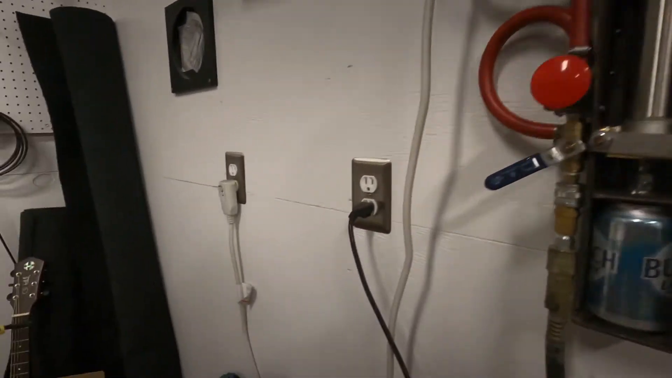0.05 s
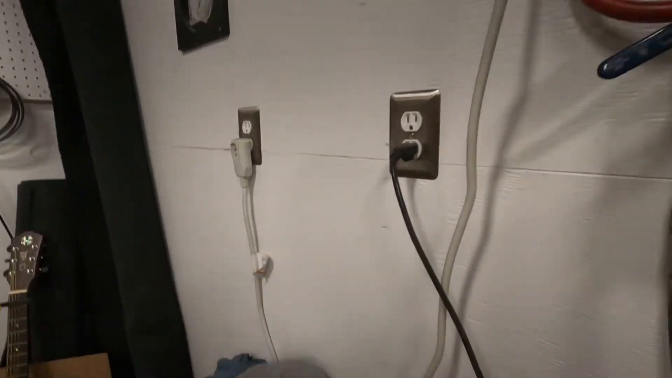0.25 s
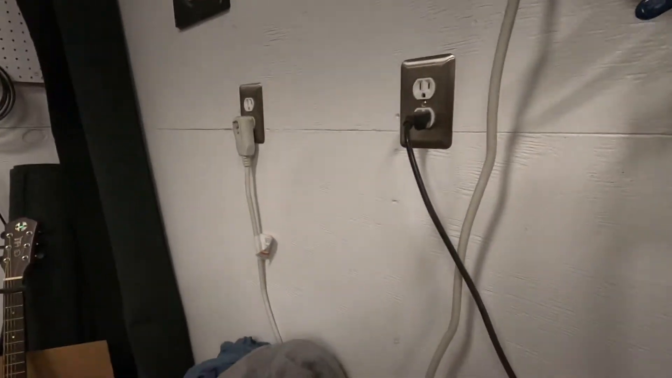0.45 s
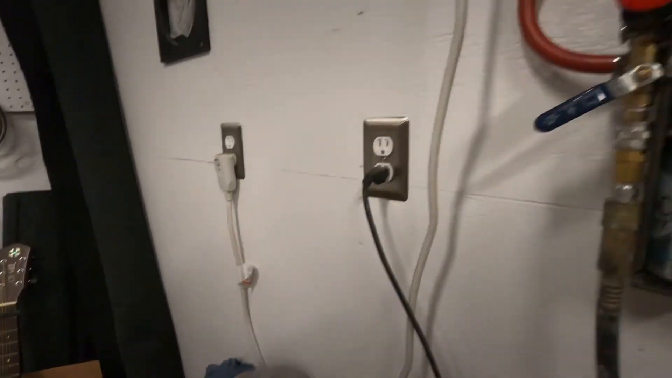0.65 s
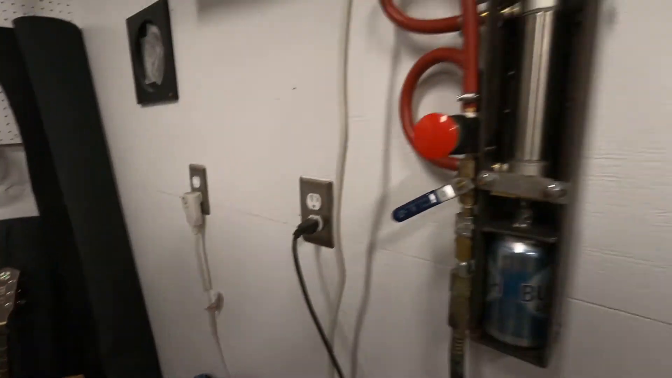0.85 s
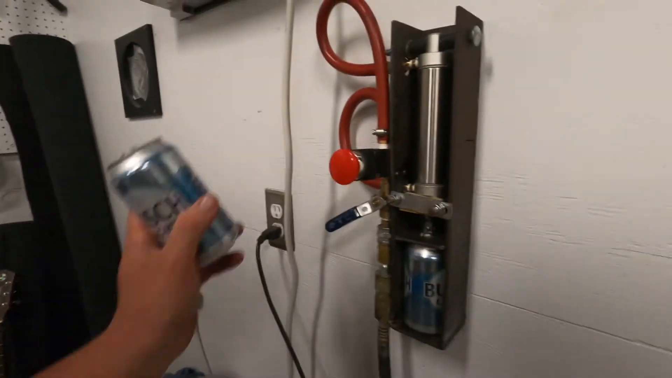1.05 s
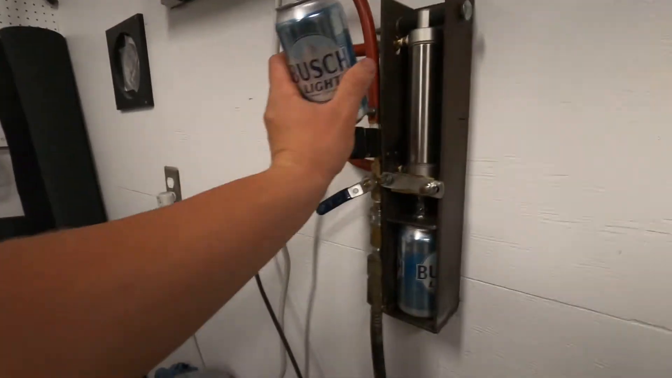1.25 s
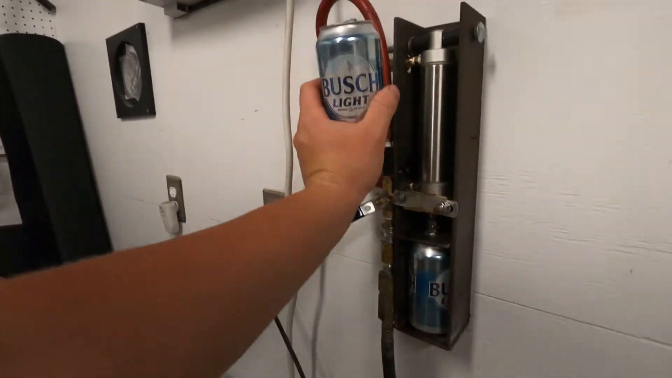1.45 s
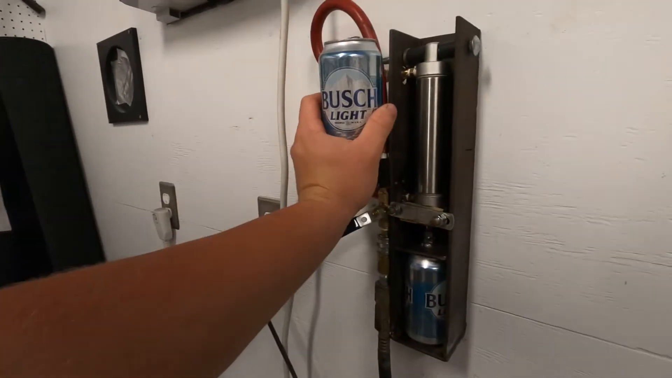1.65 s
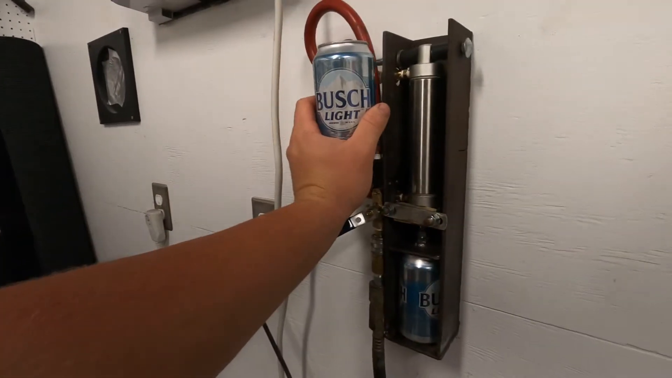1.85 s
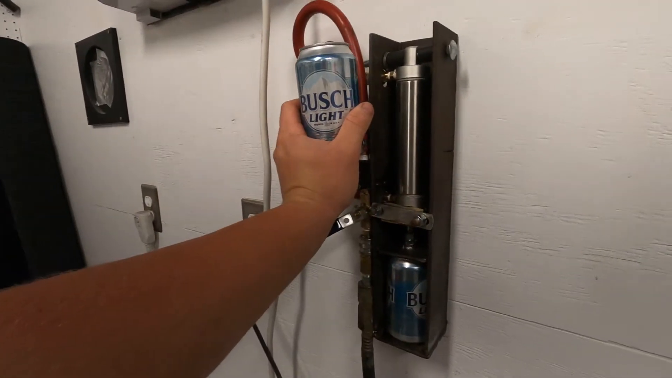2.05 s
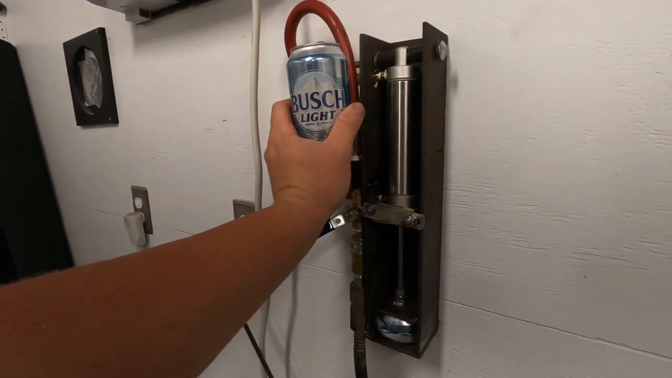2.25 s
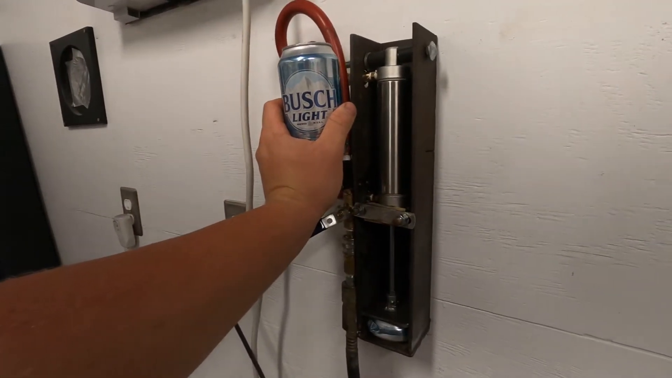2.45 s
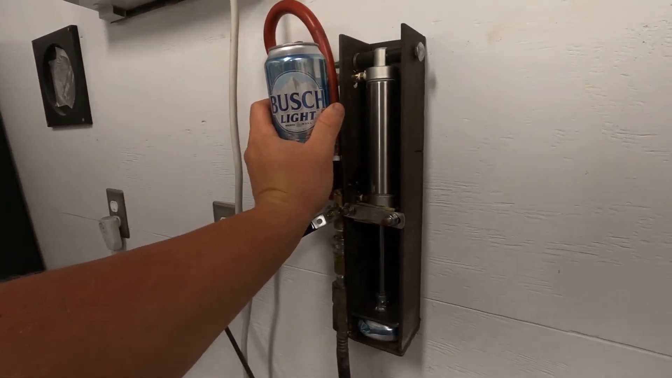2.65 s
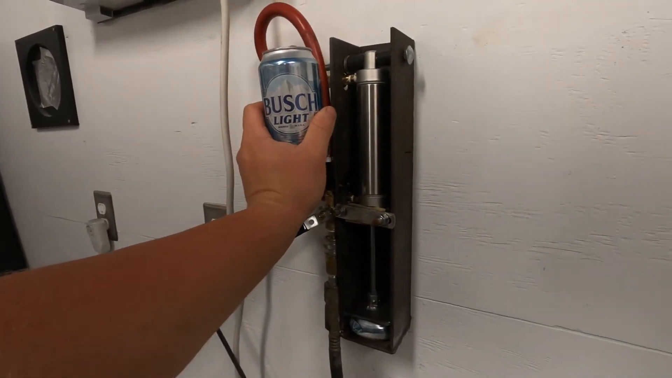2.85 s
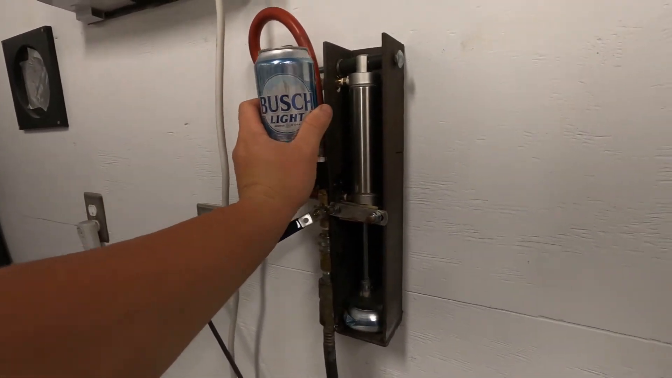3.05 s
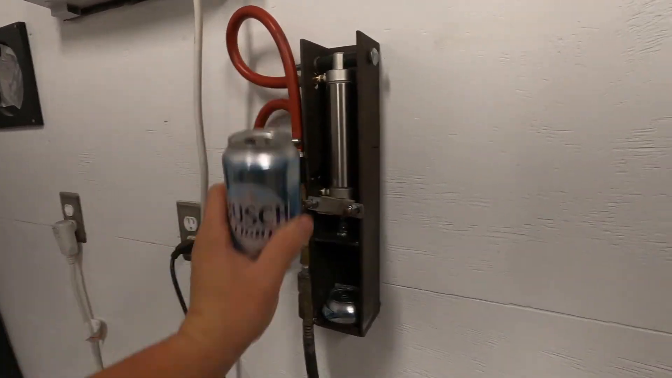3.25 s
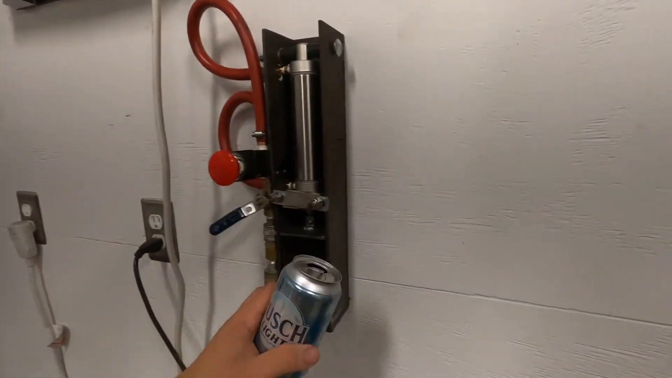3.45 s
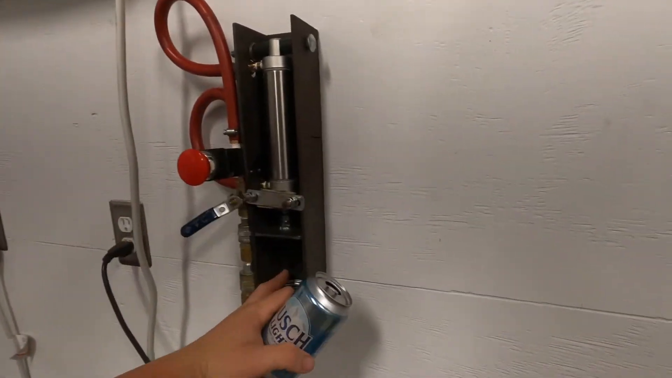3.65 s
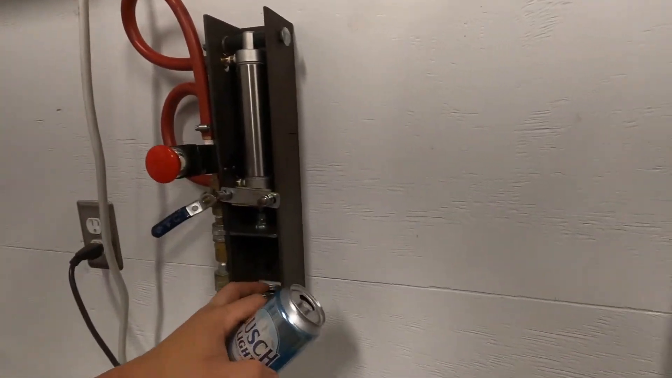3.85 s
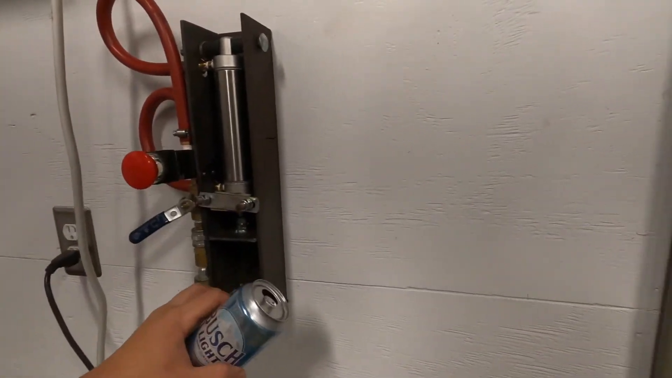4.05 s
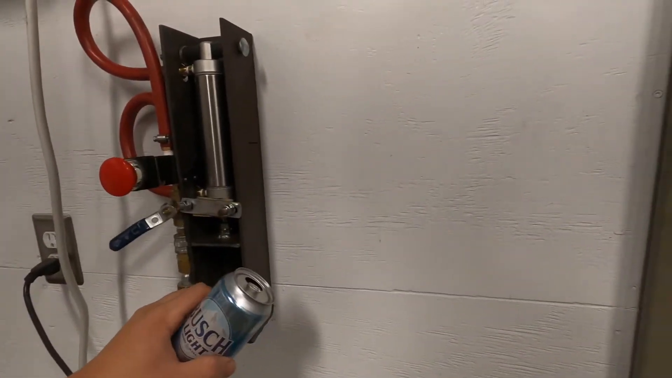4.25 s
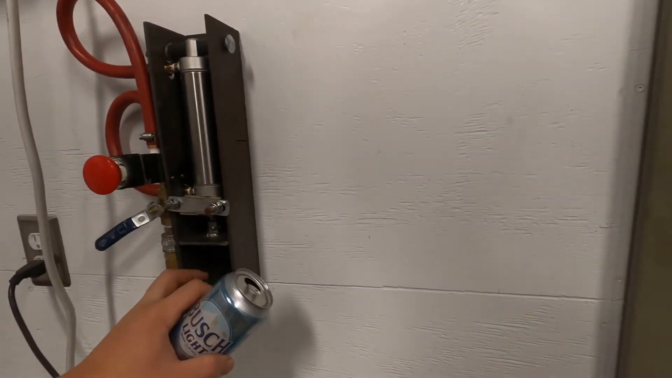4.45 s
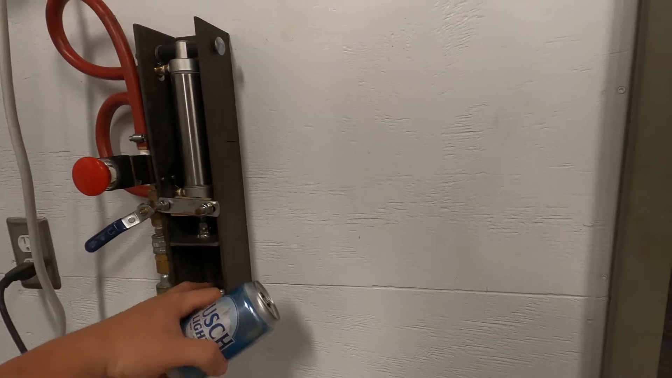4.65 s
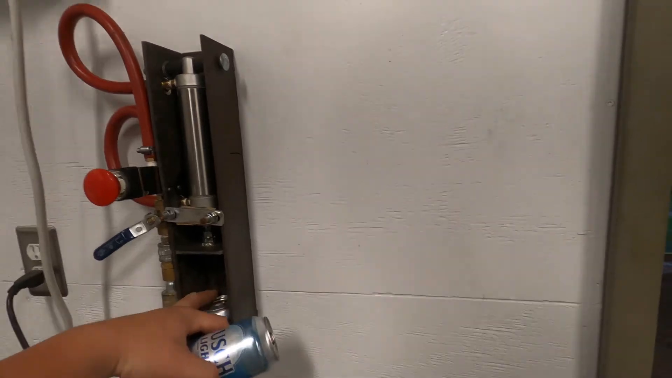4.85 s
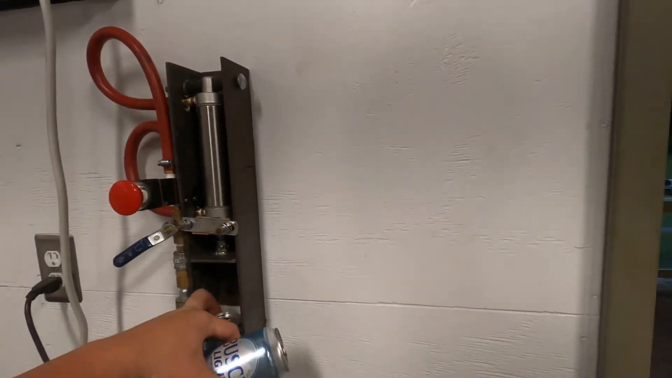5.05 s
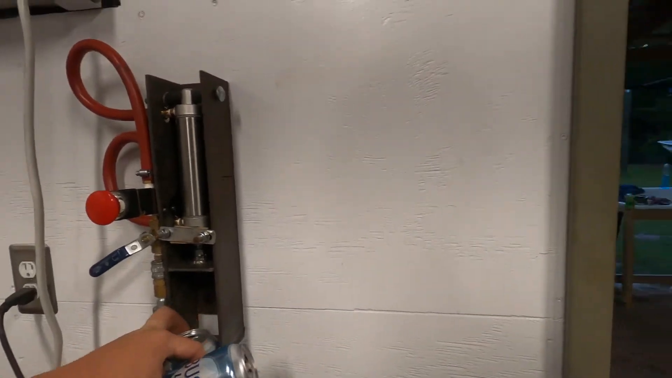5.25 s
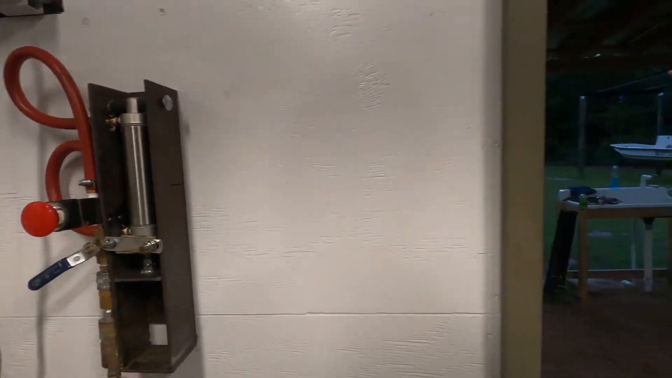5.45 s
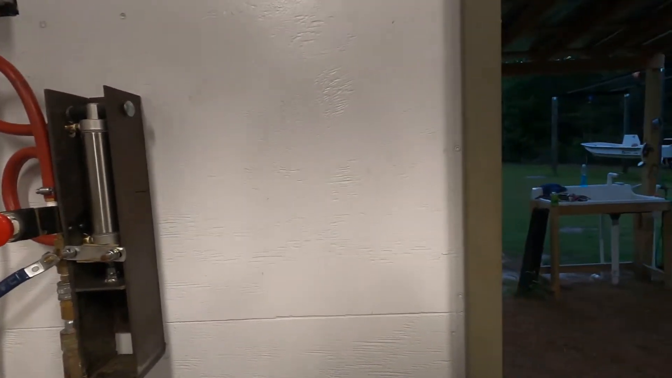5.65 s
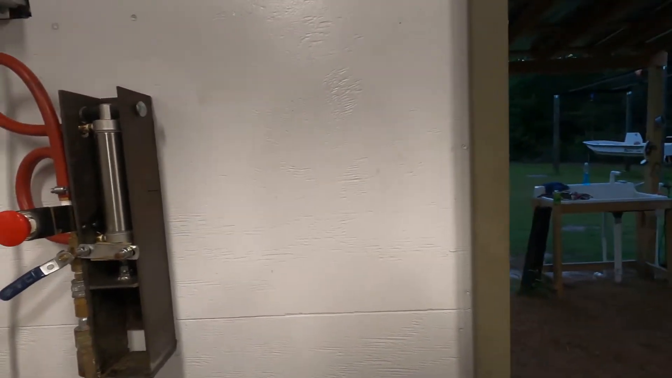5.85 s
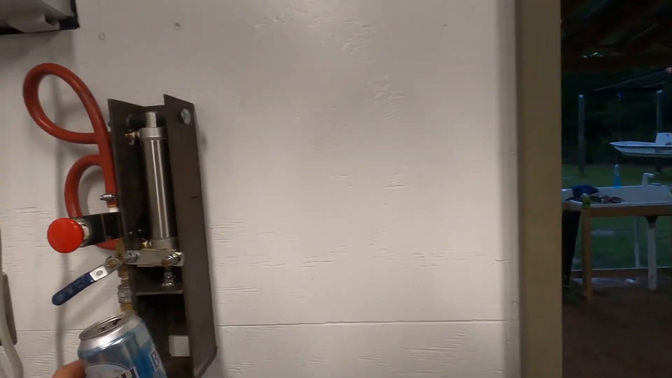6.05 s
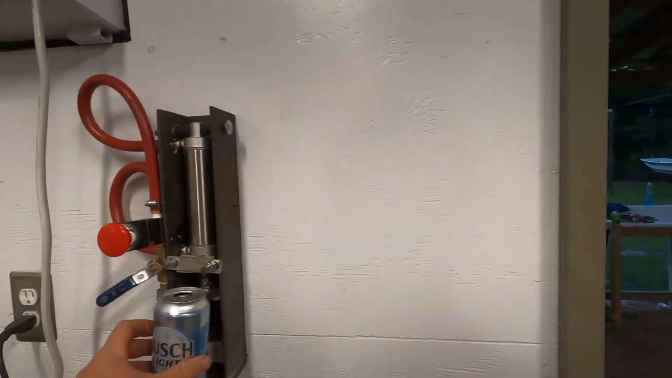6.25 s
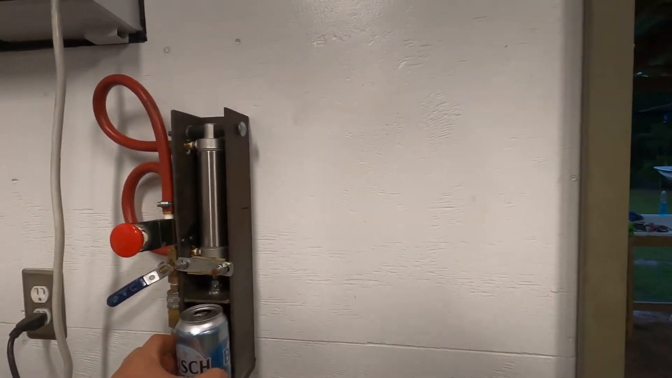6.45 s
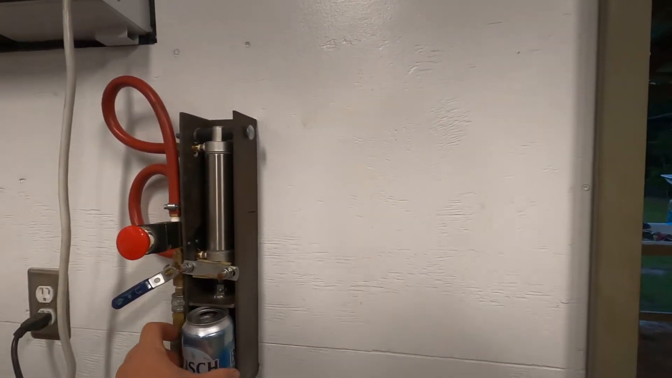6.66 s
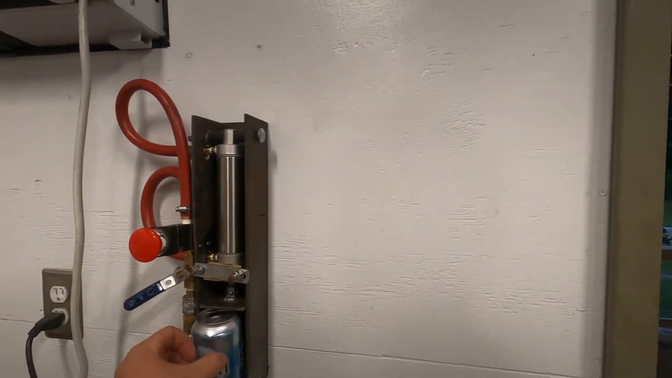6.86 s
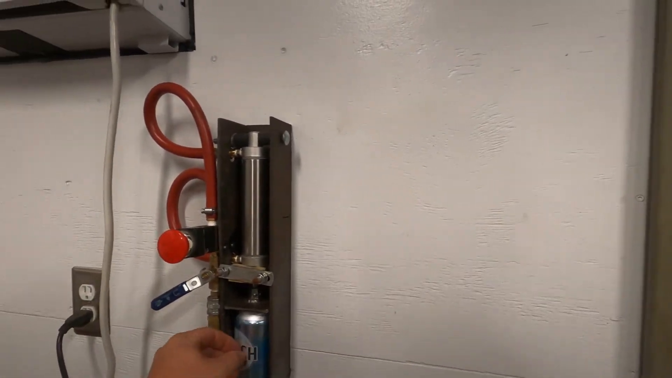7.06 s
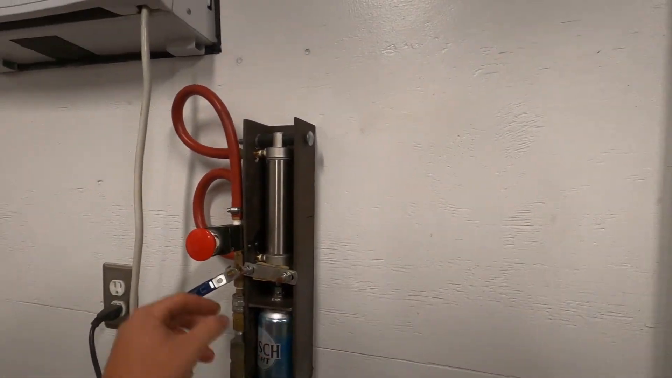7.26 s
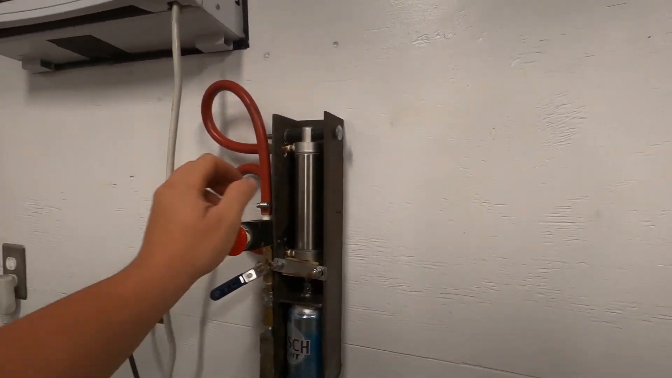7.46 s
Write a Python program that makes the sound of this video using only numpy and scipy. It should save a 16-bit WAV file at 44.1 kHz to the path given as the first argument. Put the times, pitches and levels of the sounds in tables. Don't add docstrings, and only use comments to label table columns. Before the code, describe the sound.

Hand-held close stereo pickup, nearly mono, with low handling thumps. A light can is knocked about and pressed on a button; the valve bursts open, a piston slams and thin metal crunches in rapid snaps. After a pause, air bursts out again and softly roars as the ram returns. Small metallic ticks and scrapes come from removing the flattened can, then fuller hollow clunks from seating another. Short hard-walled workshop echo, thin background hiss.

```python
import sys
import numpy as np
from scipy import signal
from scipy.fft import rfft, irfft
from scipy.io import wavfile
from scipy.ndimage import uniform_filter1d

SR = 44100
rng = np.random.default_rng(int(sys.argv[2]) if len(sys.argv) > 2 else 0)


def ratio_of_db(decibels):
    return 10 ** (np.asarray(decibels, float) / 20)


def generate_wav(sig):
    pcm = np.round(np.clip(np.atleast_2d(sig).T, -1, 1) * 32767).astype(np.int16)
    wavfile.write(sys.argv[1], SR, pcm)


N = 331632
VALVE_OPENS_S = 0.005

# time in seconds, gain in dB, room murmur in dB, thin hiss in dB.
BACKGROUND_LEVELS = [(0, -2, 4, -4), (.5, 1, -0.5, -5), (1.3, 1, -1.5, 3), (1.55, -1.5, 4, -1),
                     (1.8, -2, -15, -1), (2.6, -6.5, -11, -3), (3.1, -9, -3, 1), (3.4, -8, -3, -14),
                     (3.7, -8.5, -3, -13), (4.05, -6.5, -5, -12), (4.4, -6.5, 4, 1), (5.3, 0, -0.5, 4),
                     (5.9, -1.5, -6, 3), (6.5, -1.5, -4, 3.5), (7.52, -1, -6, -1)]
# frequency in Hz, density in dB per Hz.
BACKGROUND_COLOUR = [(100, 1), (250, -3.5), (420, 0), (800, -18.5), (1250, -9.5), (2000, -9.5),
                     (2700, -5.5), (3300, -10.5), (4800, -0.5), (6200, -13.5), (7200, -13.5), (9500, -11),
                     (11500, -20.5), (13500, -19.5)]
# frequency in Hz, peak level in dB.
HUM = [(527.6, -67.5), (2595, -82.5), (2708, -63.5), (2826, -75)]
# frequency in Hz, decay time t60 in seconds.
ROOM_DECAY = [(150, 1), (500, 0.72), (2000, 0.7), (6000, 0.55), (12000, 0.37)]
# time in seconds, peak in dB, fall in dB per second.
HANDLING = [(.06, -40.5, 230), (.4, -53, 35), (.77, -37.5, 34), (1.357, -19, 131), (1.84, -32.5, 301),
            (2.22, -35, 22), (3.14, -33, 53), (3.55, -46, 26), (1.55, -49, 40), (4.88, -36.5, 49),
            (5.57, -40.5, 90), (6.01, -43, 23), (6.2, -44, 80), (6.4, -46, 18), (7.1, -39.5, 51)]
# frequency in Hz, density in dB per Hz.
HANDLING_COLOUR = [(15, -9), (35, 1), (80, 0.5), (130, -13), (220, -20), (500, -60)]
# time in seconds, peak in dB, fall in dB per second.
PANEL = [
    (1.84, -43, 110),
    (2.5, -49.5, 24),
    (3.45, -43, 15),
    (3.95, -48, 50),
    (5.25, -49, 50),
    (7.4, -53.5, 17),
]
# frequency in Hz, density in dB per Hz.
PANEL_COLOUR = [(70, -27), (110, 0.5), (160, 2.5), (230, -5), (330, -40.5)]
# time in seconds, level in dB.
GUST = [
    (1.29, -52),
    (1.318, -25),
    (1.41, -58.5),
]
# time in seconds, level in dB.
SLEEVE = [(.72, -65), (.8, -52), (.92, -48), (1.1, -59.5), (1.28, -71)]
# centre in Hz, width in Hz, level in dB.
SLEEVE_BANDS = [(1250, 200, 8), (2000, 360, 10.5), (600, 170, 6.5)]

# start in seconds, peak in dB, contact colour in Hz, rattle length in seconds.
HELD = [(.36, -23, 1140, 0.022), (.382, -12.5, 1060, 0.011), (.419, -14.5, 900, 0.0082),
        (.476, -15, 950, 0.00058), (.744, -30, 1530, 0.01)]
TAPPED = [
    (.067, -33.5, 533, 0.0047),
    (1.296, -25, 1250, 0.026),
    (1.394, -6.5, 1850, 0.0014),
    (1.4205, -8.5, 1470, 0.0058),
]
RAM = [
    (2.143, -32, 2100, 0.0054),
    (2.1495, -2.5, 2700, 0.002),
    (3.237, -6, 2500, 0.0017),
]
CRUMPLE = [(2.221, 0, 2190, 0.015), (2.235, 0, 1580, 0.0088), (2.243, -2.5, 1900, 0.0071),
           (2.259, -17.5, 1200, 0.0078), (2.279, -12, 1210, 0.014), (2.296, 0, 1850, 0.0081),
           (2.305, -1.5, 1680, 0.0043)]
CREASES = [(2.318, -5.5, 2500, 0.0018), (2.359, -11.5, 3000, 0.0044), (2.369, -20, 5900, 0.0027),
           (2.374, -11.5, 2500, 0.0046), (2.39, -22, 2500, .002), (2.398, -6, 2380, 0.0036),
           (2.407, -12, 3200, 0.015)]
FLAT = [(3.706, -28.5, 805, 0.031), (3.724, -21, 1100, 0.011), (3.744, -29, 1146, 0.01),
        (3.907, -20.5, 900, 0.017), (3.929, -20, 824, 0.012), (3.958, -20, 1200, 0.013),
        (4.174, -34, 960, 0.016), (4.238, -35.5, 890, 0.01), (4.264, -32.5, 1750, 0.0033),
        (4.289, -23, 1080, 0.0073), (4.302, -17.5, 960, 0.0047), (4.387, -28.5, 1080, 0.01),
        (4.463, -11, 960, 0.0041), (4.477, -15.5, 865, 0.014), (4.503, -24.5, 960, 0.01),
        (4.553, -15.5, 950, 0.0061), (4.325, -27, 910, 0.0079), (5.011, -25, 2030, 0.0065),
        (5.026, -6, 1140, 0.012), (5.054, -14, 1140, 0.0086), (5.146, -21, 1880, 0.0084),
        (5.341, -25.5, 960, 0.019), (5.362, -37, 980, 0.005)]
TICKS = [(4.215, -35, 2900, .004), (4.238, -35, 1700, 0.0067), (4.387, -34.5, 2500, 0.011),
         (4.755, -25.5, 1060, 0.012), (4.77, -40, 1300, 0.0072), (4.807, -35, 900, 0.0043),
         (4.834, -26, 880, 0.011), (4.85, -20, 1190, 0.0057), (4.893, -34, 2420, 0.0079)]
SCUFFS = [(2.132, -14, 2100, 0.025), (2.212, -26, 1500, 0.009), (2.29, -18, 1900, 0.0068),
          (4.45, -19, 1000, 0.031), (5.966, -29, 975, 0.0098), (6.092, -28, 1200, .009),
          (6.155, -20, 800, 0.013), (7.25, -23, 2000, 0.013)]
LOADED = [(5.982, -8.5, 950, 0.012), (6.1, -5, 1200, 0.0073), (6.111, -7, 2500, 0.0037),
          (6.162, -4, 724, 0.026), (6.249, -25, 800, 0.014), (6.309, -27, 820, 0.016),
          (6.334, -16.5, 805, 0.0037), (6.396, -8, 600, 0.0021)]
SEATED = [(6.472, -12, 1510, 0.0025), (6.529, -8, 1790, 0.0024), (6.583, -31, 1740, 0.0027),
          (6.722, -31, 640, 0.0036), (6.77, -19, 700, 0.017), (6.78, -11.5, 1820, 0.0068),
          (6.905, -18.5, 1790, 0.0027), (6.963, -25, 676, 0.055), (7.015, -14.5, 694, 0.0076),
          (7.073, -9.5, 1240, 0.009), (7.09, -1, 2190, 0.003), (7.142, -10, 2280, 0.0038)]
DROPPED = [(7.265, -7.5, 2500, 0.0043), (7.281, 1.5, 1850, 0.003), (7.297, -24, 2010, 0.0027)]
CHATTER = [(.382, -9, 3800, 0.0019), (7.024, -13.5, 4850, 0.0082), (7.042, -22, 4460, 0.0061),
           (7.06, -12, 5470, 0.0014)]
PINGS = [(5.9815, -10.5, 4120, 0.0022), (6.1, -14.5, 3200, 0.0043), (6.187, -14, 2900, 0.007),
         (6.222, -15, 2000, 0.0033), (6.251, -24, 2900, 0.0024), (6.311, -28, 3500, 0.0027),
         (6.336, -19, 2500, 0.0036), (7.075, -20, 2600, 0.0037), (7.105, -16, 2700, 0.0043),
         (7.128, -18, 2500, 0.0057), (4.266, -35, 2400, .005), (4.33, -37, 2400, .01),
         (4.518, -32, 2170, 0.0043), (3.119, -28, 3600, .008)]

# frequency in Hz, level in dB, decay time t60 in seconds.
HELD_WALL = [(801, -10, 0.29), (1080, -15.5, 0.12), (1480, 1, 0.031), (1715, 4, 0.04)]
HELD_AIR = [(288, -5.5, 0.26), (355, 24, 0.057)]
TAPPED_WALL = [(600, 6, 0.029), (1013, -14, 0.022), (1740, 27, 0.22), (3100, -13, .06)]
CRUMPLE_WALL = [(1300, -2, 0.017), (1855, -0.5, 0.012), (2790, 1, 0.0042)]
FRAME = [(131, -18, 0.14), (157.5, 0.5, 0.15), (206, 6, 0.068), (282, 0, 0.099)]
RAM_FRAME = [(109.9, -12.5, 0.56), (212.4, 1, 0.1), (415, -3.5, 0.35)]
FLAT_WALL = [(763, -14, 0.58), (786, -1.5, 0.43), (819, -6, 0.65), (905, -0.5, 0.27), (960, 0, 0.33),
             (1060, -8, 0.021), (1140, 12, 0.072), (1290, -9, 0.22)]
FLAT_AIR = [(214, 2.5, 0.029), (320, -8.5, 0.038)]
LOADED_WALL = [(696, 1, 0.084), (950, -12.5, 0.59), (1250, -23, 0.035), (2500, 11, 0.019)]
LOADED_AIR = [(177, -7.5, 0.04), (295, -6, 0.042), (370, -7.5, 0.09)]
SEATED_WALL = [(950, -15, 0.39), (1740, -7, 0.21), (2100, -5, 0.023), (4530, -45, 0.077)]
SEATED_AIR = [(360, 20, 0.049), (425, -13, 0.21)]
DROPPED_WALL = [(1330, -3, 0.19), (1740, -2, 0.23), (2030, 7, 0.069), (3200, 1.5, 0.25), (4080, 22, .012)]
DROPPED_AIR = [(306, 15, 0.25), (334, -3, 0.23), (262.5, 3, 0.24)]
RIM = [(2900, -6, .07), (4120, -1, 0.032), (4460, -13, 0.058)]

# start in seconds, level in dB, centre in Hz, fade in seconds, low ring over scrape in dB.
SCRAPES = [(0.383, -15, 1390, 0.33, -5), (3.911, -24, 1080, 0.1, -15), (4.289, -37, 1070, 0.13, -2.5),
           (4.458, -32, 1020, 0.089, 2), (5.024, -14.5, 1010, 0.12, -6), (6.101, -26, 1730, 0.48, -16),
           (6.162, -17, 1340, 0.31, -5), (6.184, -28, 1040, 0.13, 2.5), (6.963, -31, 780, 0.28, 13.5),
           (7.02, -31, 950, 0.15, 8), (7.104, -29, 1690, 1, -29), (7.3, -28, 2600, 0.48, -10)]
# start in seconds, length in seconds, first Hz, last Hz.
SLIDE_IN = (7.016, .09, 700, 2500)
# time in seconds, peak in dB, frequency in Hz, damping per cycle.
JOLTS = [(1.6, -34, 143, 2.5), (3.15, -11, 108, 2.4), (3.164, -7.5, 140, 4.9), (2.16, -13.5, 218, 0.35),
         (3.243, -12, 220, 0.55), (6.168, -14.5, 320, 0.59), (6.2, -19, 372, 0.38), (2.325, -17, 210, 0.83),
         (7.02, -21, 312, 0.12), (7.8, -21, 312, .25), (2.1525, -7, 2800, 0.31), (2.151, -9.5, 1560, 0.44),
         (2.4035, -16, 2230, 0.63), (7.2695, -13, 2290, 0.46), (7.271, -16.5, 1300, .4),
         (.07, -30, 560, 0.64), (5.986, -17.5, 890, .12), (1.4245, -19, 1000, 0.27), (.56, -35, 268, 0.097)]
# opening in seconds, hiss in dB, sag in dB per second, hold in seconds,
# release in dB per second.
BLASTS = [
    (1.823, -16, 37.5, 0.19, 138),
    (3.135, -15.5, 30, 0.11, 2503.5),
    (3.257, -26, -8.5, 0.14, 100),
]
# whistle over hiss in dB, low roar over hiss in dB,
# extra roar fade in dB per second.
BLAST_VOICES = [
    (-3.5, -12.5, 81),
    (-3.5, -7.5, -36),
    (-23, 5.5, 6),
]
# frequency in Hz, density in dB per Hz.
JET = [(530, -23.5), (900, -18.5), (1250, -9.5), (2890, -9), (3400, -7), (5080, -4.5), (5920, -8.5),
       (8130, -10.5), (12600, -23), (14500, -28), (15000, -53)]
# frequency in Hz, width in Hz, level in dB.
PORTS = [(3520, 520, 0), (4950, 380, -1), (7300, 1400, -11), (10300, 500, -18)]
# frequency in Hz, side over mid in dB.
SIDE_COLOUR = [(60, 8.5), (110, -18), (200, -23), (380, -16), (690, 2.5), (1270, -2.5), (2350, 2),
               (4330, 7), (7970, 13.5), (14700, -2.5)]
# time in seconds, side gain in dB.
WIDTH = [(0, -8), (1.4, -6), (1.8, -23), (2.5, -34.5), (3.3, -32), (3.6, -34), (6.4, -39), (7, -24),
         (7.5, -16.5)]


def evened(x):
    return x / np.sqrt(np.mean(x ** 2) + 1e-20)


def peaked(x):
    return x / (abs(x).max() + 1e-20)


def read(points, hz):
    f, value = np.transpose(points)
    return np.interp(np.log(hz + 1), np.log(f + 1), value)


def curve(rows):
    s, *columns = np.transpose(rows)
    t = np.arange(N) / SR
    gate = uniform_filter1d(1. * (t > s[0]) * (t < s[-1]), size=300)
    return [gate] + [np.interp(t, s, c) for c in columns]


def add(mix, s, sound):
    part = mix[round(s * SR):][:len(sound)]
    part += sound[:len(part)]


def coloured(x, points):
    return irfft(rfft(x) * ratio_of_db(read(points, np.fft.rfftfreq(len(x), 1 / SR))), len(x))


def resonate(x, hz, width):
    return signal.lfilter(*signal.iirpeak(hz, hz / width, SR), x)


def band(x, lo_hz, hi_hz):
    return signal.sosfilt(signal.butter(3, [lo_hz, hi_hz], "bandpass", fs=SR, output="sos"), x)


def glide(x, hz, width):
    turn = np.exp(2j * np.pi * np.cumsum(hz) / SR)
    r = np.exp(-np.pi * width / SR)
    return 2 * (turn * signal.lfilter([1 - r], [1, -r], x / turn)).real


def patchy(points, patchy_db, flicker_db):
    frames, hz = N // 128 + 5, np.fft.rfftfreq(512, 1 / SR)
    a, b, patches = rng.standard_normal((frames, 257, 3)).T
    patches = uniform_filter1d(uniform_filter1d(patches, size=6, axis=0), size=14, axis=1)
    flicker = flicker_db * rng.standard_normal(frames)
    db = read(points, hz)[:, None] + patchy_db * evened(patches) + flicker
    return signal.istft((a + 1j * b) * ratio_of_db(db), nperseg=512, noverlap=384)[1][:N]


def background():
    cloud = evened(patchy(BACKGROUND_COLOUR, patchy_db=1.5, flicker_db=-1.0))
    t = np.arange(N) / SR
    waver = evened(uniform_filter1d(rng.standard_normal(N), size=2500))
    hum = sum(ratio_of_db(db + 0.95 * waver) * np.sin(2 * np.pi * f * t + 0.32 * waver) for f, db in HUM)
    murmur = coloured(cloud, [(2300, 0), (3200, -60)])
    thin = coloured(cloud, [(10500, -60), (11500, 0)])
    _, gain_db, murmur_db, thin_db = curve(BACKGROUND_LEVELS)
    air = cloud + (ratio_of_db(murmur_db) - 1) * murmur + (ratio_of_db(thin_db) - 1) * thin
    return ratio_of_db(gain_db - 53.5) * air + hum


def room(x):
    taps = np.zeros(SR)
    at = np.arange(200, SR - 20, 20)
    taps[at + rng.integers(0, 20, len(at))] = rng.choice([-1., 1.], len(at))
    hz, t, z = signal.stft(taps, SR, nperseg=256)
    tail = signal.istft(z * ratio_of_db(-60 * t / read(ROOM_DECAY, hz)[:, None]), SR, nperseg=256)[1]
    return signal.fftconvolve(x, tail / np.linalg.norm(tail))[:N]


def bumps(rows):
    rise_db_per_s, still_db = 233, -75
    t = np.arange(N // 64 + 1) * 64 / SR
    s, db, fall = np.transpose(rows)[:, :, None]
    level_db = (db - np.maximum(fall * (t - s), rise_db_per_s * (s - t))).max(0)
    return np.repeat(ratio_of_db(np.maximum(level_db, still_db)), 64)[:N]


def rumble():
    gust_colour = [(60, -8.5), (150, -6), (400, -11.5), (1000, -32), (3000, -67)]
    hands = np.array([evened(coloured(rng.standard_normal(N), HANDLING_COLOUR)) for _ in range(2)])
    gust = np.array([evened(coloured(rng.standard_normal(N), gust_colour)) for _ in range(2)])
    gate, gust_db = curve(GUST)
    panel = evened(coloured(rng.standard_normal(N), PANEL_COLOUR))
    return bumps(HANDLING) * hands + bumps(PANEL) * panel + gate * ratio_of_db(gust_db + 10.0) * gust


def swish():
    gate, db = curve(SLEEVE)
    cloth = rng.standard_normal(N)
    return gate * ratio_of_db(db) * evened(sum(ratio_of_db(g) * resonate(cloth, f, w) for f, w, g in SLEEVE_BANDS))


def snaps(count, grain_db):
    return rng.standard_normal(count) * ratio_of_db(grain_db * np.minimum(rng.exponential(1, count), 5))


def ring(modes, near_hz, focus_db):
    hz, db, t60 = np.transpose(modes)[:, :, None]
    t, chance = np.arange(SR // 3) / SR, rng.standard_normal((2, len(modes), 1))
    db = db - focus_db * abs(np.log2(hz / near_hz)) + 2.2 * chance[0]
    return (ratio_of_db(db - 60 * t / t60) * np.sin(2 * np.pi * hz * (1 + 0.013 * chance[1]) * t)).sum(0)


def knocks(rows, wall, air, ring_db, low_db, low_follow, treble_db, squareness, tick,
           broad=0.19, floor_hz=300, rise_s=0.00085, spread=0.21):
    out, t = np.zeros(N), np.arange(SR // 10) / SR
    for s, db, hz, length in rows:
        shape = (1 - np.exp(-t / max(rise_s, .0002))) * np.exp(-(t / max(length, .0005)) ** squareness)
        rattle = peaked(shape * snaps(count=len(t), grain_db=3.)) + tick * (np.arange(len(t)) == 20)
        wide = band(rattle, floor_hz, min(2.21 * hz, 7000))
        narrow = resonate(band(rattle, 0.66 * floor_hz, min(4.5 * hz, 9000)), hz, spread * hz)
        contact = peaked(broad * wide + 2. * narrow)
        crack = peaked(band(rattle, 2610, 8780))
        skin = peaked(signal.fftconvolve(rattle, ring(wall, hz, focus_db=13.5)))
        boom = peaked(band(signal.fftconvolve(rattle, ring(air, hz, focus_db=-6.5)), 98, 550))
        add(out, s, ratio_of_db(db - 4.5) * contact + ratio_of_db(treble_db + db) * crack)
        add(out, s, ratio_of_db(db - 2.0 + ring_db) * skin + ratio_of_db(low_db + low_follow * db) * boom)
    return out


def held_can():
    return knocks(HELD, HELD_WALL, HELD_AIR, ring_db=-5.5, low_db=-26.5, low_follow=0.044,
                  treble_db=-12, squareness=0.6, tick=0.78)


def tapped_can():
    return knocks(TAPPED, TAPPED_WALL, HELD_AIR, ring_db=-23.5, low_db=-26.5, low_follow=0.34,
                  treble_db=-10, squareness=0.85, tick=2.8, broad=0.695)


def rims():
    pings = knocks(PINGS, RIM, SEATED_AIR, ring_db=-11, low_db=-52, low_follow=0.7, treble_db=-12,
                   squareness=1.4, tick=0.53, broad=0.085, floor_hz=1200, spread=0.096)
    chatter = knocks(CHATTER, RIM, SEATED_AIR, ring_db=-12.5, low_db=-60, low_follow=0.67,
                     treble_db=-26, squareness=0.43, tick=0.54)
    return pings + chatter


def scuffs():
    return knocks(SCUFFS, CRUMPLE_WALL, FRAME, ring_db=-23, low_db=-31, low_follow=1.0, treble_db=-22,
                  squareness=6., tick=0.0, broad=0.4, floor_hz=600, rise_s=.03)


def pried_can():
    clacks = knocks(FLAT, FLAT_WALL, FLAT_AIR, ring_db=-8.0, low_db=-31.5, low_follow=0.57,
                    treble_db=-20.5, squareness=0.98, tick=0.79, broad=0.5, floor_hz=470)
    ticks = knocks(TICKS, FLAT_WALL, FLAT_AIR, ring_db=-19, low_db=-34.5, low_follow=0.49,
                   treble_db=-23, squareness=0.8, tick=0.76, broad=0.45, floor_hz=600)
    return clacks + ticks


def next_can():
    loaded = knocks(LOADED, LOADED_WALL, LOADED_AIR, ring_db=-14.0, low_db=-11.5, low_follow=1.0,
                    treble_db=-24.5, squareness=0.64, tick=0.38)
    seated = knocks(SEATED, SEATED_WALL, SEATED_AIR, ring_db=-18.5, low_db=-16.5, low_follow=0.41,
                    treble_db=-26, squareness=0.82, tick=0.75)
    dropped = knocks(DROPPED, DROPPED_WALL, DROPPED_AIR, ring_db=-11.5, low_db=-20.5, low_follow=0.84,
                     treble_db=-21, squareness=0.96, tick=1.0, broad=0.4, spread=0.45, rise_s=0.00043)
    return loaded + seated + dropped


def scrapes():
    rise_s, fade_db, sag, hollow_linger = 0.009, -36, 0.33, 0.039
    unevenness = evened(uniform_filter1d(rng.standard_normal(N + SR), size=150))
    grains = snaps(count=N + SR, grain_db=2.5) * ratio_of_db(3.4 * unevenness)
    wide_colour = [(250, -36), (500, -16.0), (2500, -2.0), (5000, -16.5), (12000, -44.5)]
    wide = evened(coloured(grains, wide_colour))
    hollow = evened(resonate(grains, 336.6, 39))
    out, t = np.zeros(N), np.arange(SR // 3) / SR
    for s, db, centre_hz, fade, low_db in SCRAPES:
        span, gone = slice(round(s * SR), round(s * SR) + len(t)), t / fade
        hz = centre_hz * (1 - sag * np.minimum(gone, 1))
        wall = evened(glide(glide(grains[span], hz, 720), hz, 550))
        wall = wall + 0.5 * evened(glide(grains[span], 2.1 * hz, 260))
        hollow_level = ratio_of_db(low_db - hollow_linger * fade_db * gone)
        body = wide[span] + 0.44 * wall + hollow_level * hollow[span]
        start = np.minimum(t / rise_s, 1)
        stop = np.clip((min(fade, t[-1]) - t) / rise_s, 0, 1)
        add(out, s - rise_s / 2, start * stop * ratio_of_db(db - 8.5 + fade_db * gone) * body)
    return out


def slide_in():
    s, length, from_hz, to_hz = SLIDE_IN
    t, out = np.arange(SR // 4) / SR, np.zeros(N)
    done, grains = np.minimum(t / length, 1), snaps(count=len(t), grain_db=4.5)
    hz = from_hz * (to_hz / from_hz) ** done ** 2
    wall = evened(glide(glide(grains, hz, 260), hz, 260)) + 0.23 * evened(glide(grains, 1.9 * hz, 300))
    level = np.minimum(t / .01, 1) * ratio_of_db(-900 * np.maximum(t - length, 0))
    air = evened(resonate(np.tanh(grains) * level, 303, 25))
    swell = ratio_of_db(-18 - 10.5 * (1.5 - done))
    add(out, s, swell * level * wall + ratio_of_db(-33.5) * air)
    return out


def crushed_can():
    ram = knocks(RAM, CRUMPLE_WALL, RAM_FRAME, ring_db=-1.5, low_db=-13.5, low_follow=0.48,
                 treble_db=-39, squareness=0.61, tick=4.1, spread=.45)
    crumple = knocks(CRUMPLE, CRUMPLE_WALL, FRAME, ring_db=-15, low_db=-18.5, low_follow=1.0, treble_db=-19.0,
                     squareness=2.05, tick=0.72, broad=1.3, rise_s=.002, spread=0.62)
    creases = knocks(CREASES, CRUMPLE_WALL, FRAME, ring_db=-19, low_db=-19.5, low_follow=0.98,
                     treble_db=-38, squareness=1.04, tick=0.73, broad=0.4, spread=0.32)
    return ram + crumple + creases


def jolts():
    out = np.zeros(N)
    for s, db, hz, damping in JOLTS:
        cycles = np.arange(5000) / SR * hz
        swing = np.sin(2 * np.pi * cycles) * cycles * np.exp(-damping * cycles)
        add(out, s - .004, -ratio_of_db(db) * peaked(swing))
    return out


def valve(t, hiss_db, sag, hold, release):
    surge_db, surge_s, leak_db, leak_db_per_s = 3.5, 0.026, -14, 951
    after = np.maximum(t, 0)
    surge = surge_db * np.exp(-after / surge_s)
    flow = surge - sag * np.minimum(after, hold) - release * np.maximum(t - hold, 0)
    leak = leak_db * np.clip(-t / VALVE_OPENS_S, 0, 1) + leak_db_per_s * np.minimum(t + VALVE_OPENS_S, 0)
    return hiss_db + flow + leak


def blasts():
    jet = evened(patchy(JET, patchy_db=1.6, flicker_db=-1.8))
    source = patchy([(100, 0.019), (15000, 0.005)], patchy_db=-1.5, flicker_db=2.2)
    whistle = evened(sum(ratio_of_db(db) * resonate(resonate(source, f, w), f, w) for f, w, db in PORTS))
    roar, out = evened(band(source, 100, 380)), np.zeros(N)
    fizz = coloured(jet, [(4300, -17.5), (6500, -2.5)])
    for (s, *flow), (port_db, low_db, low_fade) in zip(BLASTS, BLAST_VOICES):
        t = np.arange(N) / SR - s
        hiss_db = valve(t, *flow)
        whistle_db = np.where(t < -VALVE_OPENS_S / 2, 7.5, port_db)
        roar_db = hiss_db + low_db - low_fade * np.clip(t, 0, 1)
        dull = np.clip(-(hiss_db + 14) * .065, 0, .9)
        out += ratio_of_db(hiss_db - 3.0) * (jet - dull * fizz + ratio_of_db(whistle_db) * whistle)
        out += ratio_of_db(roar_db - 8.5) * roar
    return out


def scene():
    near = tapped_can()
    cans = held_can() + rims() + scuffs() + pried_can() + next_can() + crushed_can()
    cans += scrapes() + slide_in()
    air = blasts() + jolts()
    sent = cans + ratio_of_db(-5.5) * near + ratio_of_db(-4.0) * band(air, 250, 15000)
    turn = 2 * np.pi * 7 * np.arange(N) / SR
    echo = room(sent * np.cos(turn)) + room(sent * np.sin(turn))
    mid = cans + near + air + ratio_of_db(-8.5) * echo + swish() + background()
    return mid + rumble()


def top_cut(x):
    return signal.sosfilt(signal.butter(12, 15290, fs=SR, output="sos"), x)


def record(dry):
    mid = dry.mean(0)
    scatter = rng.standard_normal(2500) * np.exp(-np.arange(2500) / 450)
    scattered = signal.oaconvolve(mid, scatter / np.linalg.norm(scatter))[:N]
    side = coloured(scattered, SIDE_COLOUR) + (dry[0] - dry[1]) / 2
    top = coloured(.6 * side - .5 * mid, [(10500, -60), (11700, 0)])
    below = coloured(side + 0.35 * mid, [(11000, -1.5), (11700, -52)])
    side = ratio_of_db(curve(WIDTH)[1]) * below + top
    loud = np.tanh(np.array([mid + side, mid - side]) / 1.9) * 1.9
    edge = [(14000, 0), (14500, -14), (15000, -70)]
    ports = np.clip([coloured(v, edge) for v in loud], -.95, .95)
    return top_cut(ports)


dry = scene()
out = record(dry)
generate_wav(out)
```